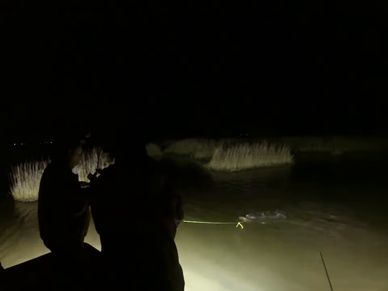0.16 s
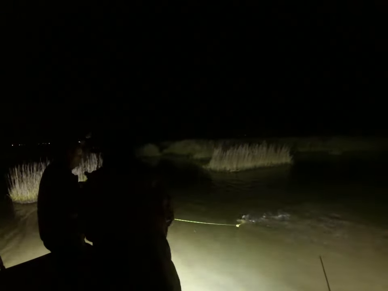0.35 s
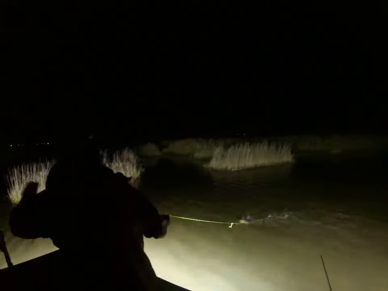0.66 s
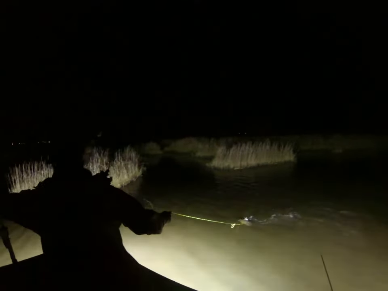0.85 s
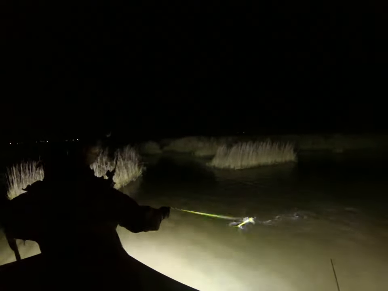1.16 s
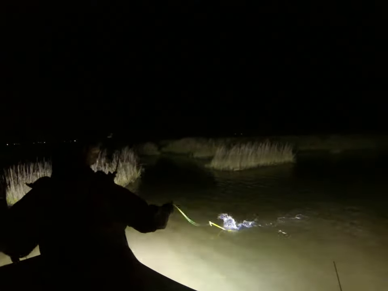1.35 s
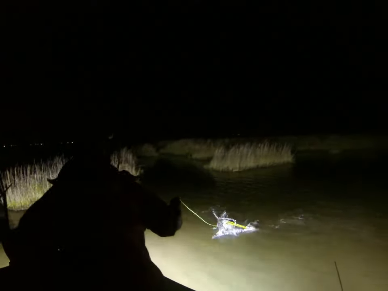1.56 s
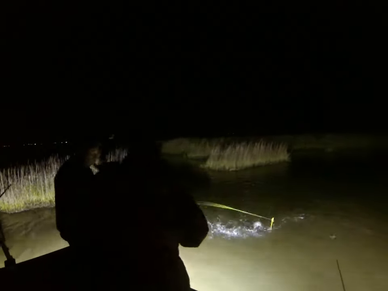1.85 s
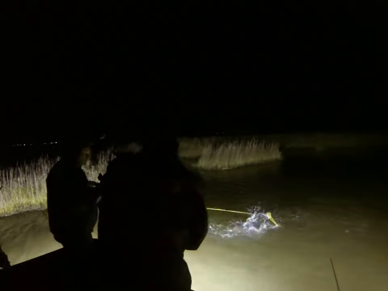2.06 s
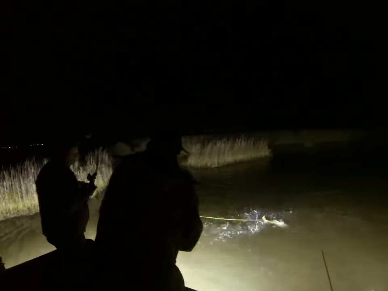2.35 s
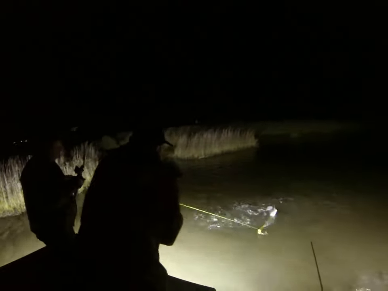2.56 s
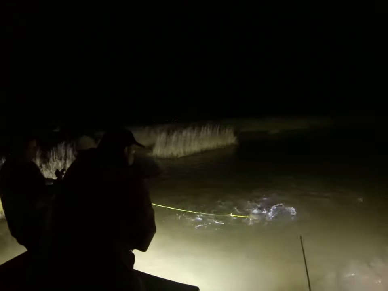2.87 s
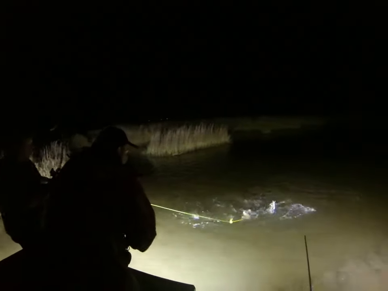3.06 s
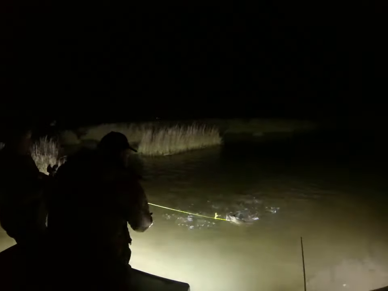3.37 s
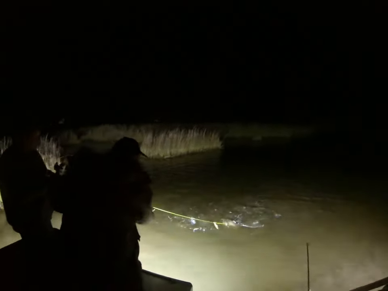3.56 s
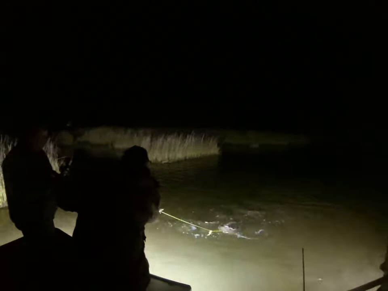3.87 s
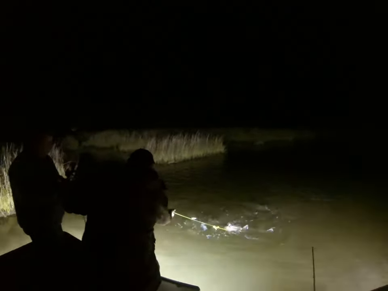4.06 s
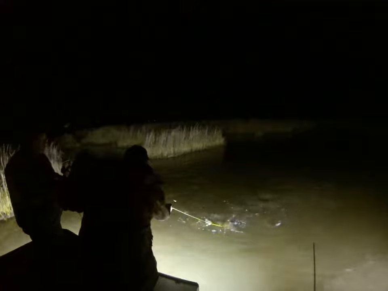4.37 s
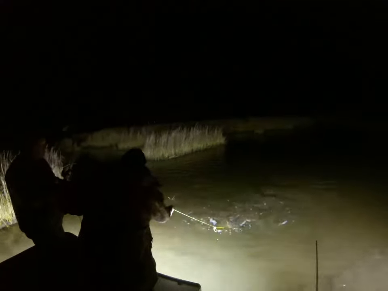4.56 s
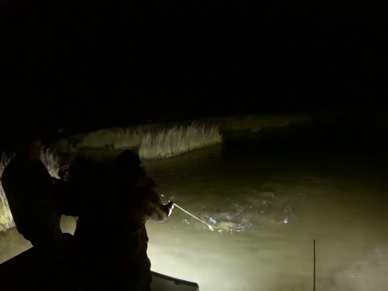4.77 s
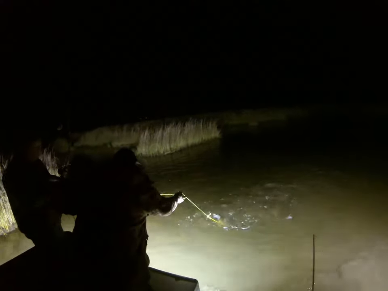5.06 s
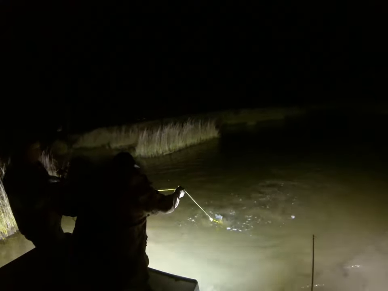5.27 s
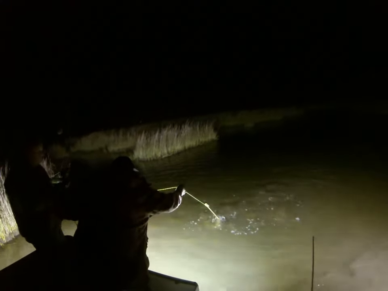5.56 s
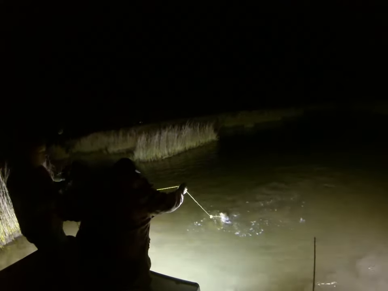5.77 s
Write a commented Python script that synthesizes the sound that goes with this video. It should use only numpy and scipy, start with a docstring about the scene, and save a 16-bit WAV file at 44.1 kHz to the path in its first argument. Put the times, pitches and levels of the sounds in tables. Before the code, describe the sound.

An airboat engine drones steadily with a deep rumble, rattling clatter and a whine, with a few dull knocks and faint splashes.

```python
"""A single-cylinder engine drones through the hull of a flat boat at night, heard from on board.
Its valves and piston rattle the muffler, cover and fins, and a wheel that it drives whines.
A slower engine idles under it, so that their hums beat. The hull rocks and takes a few dull bumps;
water splashes faintly, with a steady hiss farther from the microphone."""
import sys
import numpy as np
from scipy import signal
from scipy.fft import rfft, irfft, next_fast_len
from scipy.io import wavfile
from scipy.ndimage import uniform_filter1d, map_coordinates

SR = 44100
rng = np.random.default_rng(int(sys.argv[2]) if len(sys.argv) > 2 else 0)


def master(y):
    """Save y as 16-bit WAV."""
    cut = np.clip(np.atleast_2d(y).T, -1, 1)
    pcm = np.round(cut * 32767)  # scale
    wavfile.write(sys.argv[1], SR, pcm.astype(np.int16))


N = 261072

# Colours of far water, spray and droplets. Each row: frequency in Hz, relative density in dB.
HISS_SPECTRUM = [(2500, -52.5), (4500, -5.5), (6000, -7.5), (7500, -2), (10000, -10), (12000, -14.5),
                 (15000, -15.5), (17000, -57)]
SPRAY_SPECTRUM = [(1500, -40), (3000, 0), (4500, -4), (6200, 0), (8500, -10), (12000, -10), (15000, -18),
                  (17000, -60)]
DROPLET_SPECTRUM = [(3000, -40), (6000, -6), (8000, 0), (11000, 0), (14000, -8), (17000, -60)]
# Faint splashes. Each row: start in seconds, relative level in dB, seconds to fall 60 dB.
SPLASHES = [(1.165, -66, .02), (1.34, -72, .15), (1.889, -59, .06), (2.415, -67, .03), (2.8, -70, .15),
            (3.995, -68, .03)]
# The spatter of droplets. Each row: time in seconds, level in dB.
SPATTER_LEVEL = [(0, -89.5), (.5, -85.5), (.95, -84), (1.25, -86), (1.4, -83.5), (1.75, -82), (2.1, -87.5),
                 (2.5, -83.5), (3.2, -86), (5.92, -87.5)]

# The hull rocking. Each row: frequency in Hz, relative density in dB.
ROCKING_SPECTRUM = [(5, -29), (10, -4.5), (25, 0), (44, -4), (56, 3.5), (64, -14), (80, -77)]
# Bumps on the hull. Each row: start in seconds, level in dB, pitch in Hz, seconds to fall 60 dB.
HULL_BUMPS = [(2.91, -48, 270, .06), (2.925, -26, 25, .2), (3.335, -23, 14, .3), (3.853, -23, 19, .2),
              (3.975, -19, 24, .2), (4.08, -50, 260, .05), (4.15, -61, 810, .2), (4.13, -62, 670, .2),
              (4.57, -56, 420, .1)]

# The idling engine's pace, sagging once. Each row: time in seconds, firing rate in Hz.
IDLE_FIRING_RATE = [(0, 58.12), (1.6, 58.39), (2.9, 58.34), (3.3, 57.27), (3.8, 58.33), (5.92, 58.23)]
# Its hum. Each row: time in seconds, level in dB.
IDLE_HUM_LEVEL = [(0, -38.8), (1.6, -38.7), (1.9, -42.6), (2.42, -36.3), (2.75, -44.3), (3.3, -37.6),
                  (3.8, -49.4), (4.25, -37.4), (4.47, -44.0), (4.85, -35.4), (5.3, -41.9), (5.92, -39.7)]
# Its weaker tones. Each row: multiple of the firing rate, level in dB.
IDLE_ORDERS = [(.5, -49), (1.5, -62), (2, -58), (2.25, -61), (2.5, -61), (3, -67), (3.5, -68), (4.5, -74),
               (5, -75)]
# Its exhaust and propeller wash. Each row: frequency in Hz, relative density in dB.
RUMBLE_SPECTRUM = [(50, -19), (64, 2.5), (100, -2.5), (145, -2.5), (170, -7.5), (182, -10), (260, -17.5),
                   (480, -21.5), (700, -25), (850, -30), (1150, -28.5), (1600, -62.5), (2500, -120)]

# The resonance that the wheel's overtones cross. Each row: time in seconds, centre in Hz, level in dB.
WHINE_RESONANCE = [(0, 695, -74), (.6, 765, -71), (1.5, 765, -71.5), (1.8, 592, -66), (2.4, 624, -68),
                   (3.5, 660, -69), (3.9, 626, -74), (4.3, 674, -71.5), (5, 607, -66), (5.92, 602, -64.5)]
# Overtones that sing out once. Each row: multiple of the wheel's speed, level in dB.
SINGING_ORDERS = [(26, -61), (28, -55)]
# Valve and piston contacts in a cycle of two turns.
# Each row: position as a share of the cycle, then relative dB in the muffler, the cover and the fins.
CONTACTS = [(.02, 2, -3, -2), (.13, -12, -8, -3), (.27, -12, -4, -4), (.39, -12, -10, -4), (.5, 0, -9, -2),
            (.62, -12, -2, -2), (.75, -8, 0, -3), (.86, -8, -2, -3), (.95, -2, -7, 0)]
# Resonances of those three parts. Each row: centre in Hz, width in Hz, relative level in dB.
MUFFLER_MODES = [(373, 330, -3.5), (615, 200, -1.5), (787, 30, -4)]
COVER_MODES = [(990, 25, -26), (1285, 55, -11), (1340, 70, -3), (1404, 30, 1), (1455, 90, -4),
               (1510, 110, -6), (1580, 130, -11), (1670, 120, -14)]
FIN_MODES = [(1960, 45, -2), (2583, 50, -3), (3220, 80, -4), (3400, 50, -3), (3505, 35, -6),
             (4600, 90, -16), (1870, 100, -8), (2060, 250, -5), (2570, 250, -2), (2700, 120, -4),
             (2820, 200, -8), (3050, 200, -10), (3340, 250, -6), (3600, 200, -12), (3800, 300, -13),
             (4000, 200, -12), (4560, 300, -19), (4800, 220, -18), (5400, 550, -21), (6200, 450, -25),
             (6700, 400, -28)]
# The clatter at the microphone.
# Each row: time in seconds, cover level in dB, fin level in dB, extra dB for the cover's hardest blow.
CLATTER_LEVELS = [(0, -48.5, -55.5, -3), (.7, -50.5, -56, -1.5), (1.9, -50, -54.5, 0.5),
                  (2.5, -49.5, -54.5, 2), (3.3, -49.5, -54.5, -0.5), (3.85, -48.5, -55.5, -1.5),
                  (4.2, -50, -54.5, 3), (5.92, -48, -54, 1)]
# The single-cylinder engine hunting round its set speed. Each row: time in seconds, shaft speed in Hz.
SHAFT_SPEED = [(0, 48.03), (.3, 47.81), (.8, 48.51), (1.4, 48.95), (1.75, 48.03), (1.95, 47.19),
               (2.75, 47.81), (3.35, 47.97), (3.85, 47.44), (4.15, 48.7), (4.75, 48.11), (5.2, 47.46),
               (5.65, 47.1), (5.92, 48.2)]
# Its hum in the hull. Each row: time in seconds, level in dB.
DRONE_HUM_LEVEL = [(0, -20), (.2, -21.8), (.37, -19.2), (.5, -21.8), (.7, -18.8), (1.4, -20.3), (1.95, -22),
                   (2.8, -21.6), (2.94, -25.5), (3.03, -22.6), (3.33, -21.2), (3.8, -27), (3.95, -25.9),
                   (4.05, -19.9), (4.4, -16.8), (4.53, -19), (4.65, -17.6), (4.9, -18.8), (5.15, -21.4),
                   (5.3, -19.5), (5.52, -22.6), (5.72, -18.7), (5.92, -18.6)]
# Its weaker tones. Each row: multiple of the shaft speed, level in dB.
DRONE_ORDERS = [(.5, -52), (2, -49), (3, -58), (3.5, -62)]


def amp(db):
    """Decibels to gain."""
    return 10 ** (np.asarray(db) / 20)


def unit(x):
    """x at rms 1."""
    return x / np.sqrt(np.mean(x ** 2) + 1e-20)


def curves(rows):
    """One value per sample for each column after the time."""
    times, *columns = np.transpose(rows)
    return [np.interp(np.arange(N) / SR, times, column) for column in columns]


def wobble(rate):
    """A smooth random curve, rate knots a second."""
    knots = rng.standard_normal(int(N / SR * 60) + 4)
    return map_coordinates(knots, [np.arange(N) * rate / SR])


def filtered(x, response):
    """x through a filter given as a complex response of frequency."""
    size = 2 * next_fast_len(N // 2 + SR // 4)
    return irfft(rfft(x, size) * response(np.fft.rfftfreq(size, 1 / SR)), size)[:N]


def rush(spectrum, patchy_db):
    """Noise of rms 1 with the given colour and patches of random gain."""
    frames = signal.stft(rng.standard_normal(N), nperseg=512)[2]
    patches = uniform_filter1d(rng.standard_normal(frames.shape), size=5, axis=0)
    patches = uniform_filter1d(patches, size=10, axis=1)
    noise = signal.istft(frames * amp(patchy_db * unit(patches)), nperseg=512)[1][:N]
    knot_hz, db = np.transpose(spectrum)
    return unit(filtered(noise, lambda hz: amp(np.interp(np.log(hz + 1), np.log(knot_hz + 1), db))))


def orders(turns, table, flutter_db, drift):
    """Sines on multiples of a rotation, each wavering in level and phase."""
    out = 0
    for k, db in table:
        gain = np.sqrt(2) * amp(db + flutter_db * wobble(7))
        out += gain * np.sin(2 * np.pi * (k * turns + drift * np.sqrt(k) * wobble(5)))
    return out


def ringing(modes):
    """The causal response of steep resonances whose powers add."""
    def response(hz):
        power = sum(amp(2 * db) / (1 + (2 * (hz - centre) / width) ** 2) ** 2
                    for centre, width, db in modes)
        cepstrum = irfft(np.log(power + 1e-12) / 2)
        causal_fold = 1 + np.sign(np.fft.fftfreq(len(cepstrum)))
        return np.exp(rfft(cepstrum * causal_fold)[:len(hz)])
    return response


def water():
    """Water round the boat: short splashes of spray, a spatter of droplets and a steady far hiss."""
    splashes, t = np.zeros(N + SR), np.arange(SR // 2) / SR
    for start, db, t60 in SPLASHES:
        splashes[round(start * SR):][:len(t)] += 2 * amp(db - 60 * t / t60) * (1 - np.exp(-t / .004))
    impacts = (rng.random(N) < 170 / SR) * amp(3.5 * rng.standard_normal(N))  # about 170 a second
    droplets = unit(signal.fftconvolve(impacts, amp(-60 * t / .008))[:N])
    spatter = amp(curves(SPATTER_LEVEL)[0]) * droplets * rush(DROPLET_SPECTRUM, patchy_db=3.5)
    hiss = amp(-76 + .7 * wobble(9)) * rush(HISS_SPECTRUM, patchy_db=1.5)
    return splashes[:N] * rush(SPRAY_SPECTRUM, patchy_db=1) + spatter + hiss


def hull():
    """Under the microphone the hull rocks in the lowest bass and rings dully at each bump."""
    bumps, t = np.zeros(N + SR), np.arange(SR // 2) / SR
    for start, db, hz, t60 in HULL_BUMPS:
        envelope = amp(db - 60 * t / t60) * (1 - np.exp(-t * hz * 1.5))
        bumps[round(start * SR):][:len(t)] += envelope * np.sin(2 * np.pi * hz * t)
    rocking = amp(-42.5 + 2 * wobble(2.3)) * rush(ROCKING_SPECTRUM, patchy_db=-.6)
    return bumps[:N] + rocking


def idling_engine():
    """Behind the drone, a firing hum with uneven cylinders, over broad exhaust rumble."""
    (firing_hz,), (hum_db,) = curves(IDLE_FIRING_RATE), curves(IDLE_HUM_LEVEL)
    firings = .379 + np.cumsum(firing_hz) / SR
    hum = np.sqrt(2) * amp(hum_db) * np.cos(2 * np.pi * firings)
    rumble = amp(-49 + .2 * wobble(5.3)) * rush(RUMBLE_SPECTRUM, patchy_db=1.5)
    return hum + orders(firings, IDLE_ORDERS, flutter_db=2.5, drift=.054) + rumble


def wheel_whine(turns, half_width_hz=60):
    """Overtones of the driven wheel, strongest near a resonance that shifts as the microphone turns."""
    centre_hz, level_db = curves(WHINE_RESONANCE)
    wheel_hz = np.gradient(turns) * SR
    out = 0
    for k in range(10, 17):
        detuning = (k * wheel_hz - centre_hz) / half_width_hz
        gain = amp(1.4 * wobble(6)) / (1 + detuning ** 2)
        out += gain * np.sin(2 * np.pi * (k * turns + .05 * wobble(8)))
    return np.sqrt(2) * amp(level_db) * out


def wheel_singing(turns, centre_s=3.755, half_length_s=.27):
    """Two high overtones of the driven wheel swell and fade once."""
    swell = np.exp(-((np.arange(N) / SR - centre_s) / half_length_s) ** 4)
    return swell * orders(turns, SINGING_ORDERS, flutter_db=3, drift=.02)


def clatter(cycles, muffler_db=-63):
    """Valve and piston contacts repeat with scatter, reach the parts unevenly and shake rattle loose."""
    cover_db, fins_db, slap_db = curves(CLATTER_LEVELS)
    starts = np.arange(int(cycles[-1]) + 1)
    part_blows = np.zeros((3, N))
    for share, *reach_db in CONTACTS:
        lateness, force = rng.standard_normal((2, 160))[:, :len(starts)]
        at = np.searchsorted(cycles, starts + share + .007 * lateness)
        part_blows[:, at[at < N]] += amp(np.add.outer(reach_db, 1.6 * force[at < N]))
    part_blows[1] *= amp(slap_db * (abs(cycles % 1 - .75) < .05))  # the cover's hardest blow
    t, out = np.arange(SR // 20) / SR, 0
    parts = [(MUFFLER_MODES, muffler_db, .4, .3),
             (COVER_MODES, cover_db, 1.2, .85),
             (FIN_MODES, fins_db, 2.6, .45)]
    for blows, (modes, db, steady_rattle, clean_knock) in zip(part_blows, parts):
        bursts = signal.fftconvolve(blows, amp(-60 * t / .06))[:N]
        rattle = unit((unit(bursts) + steady_rattle) * rng.standard_normal(N))
        out += amp(db) * unit(filtered(clean_knock * unit(blows) + rattle, ringing(modes)))
    return out


def droning_engine(belt_ratio=1.056):
    """Up front, one four-stroke cylinder: a nearly pure hum at shaft speed, with whine and clatter."""
    (shaft_hz,), (hum_db,) = curves(SHAFT_SPEED), curves(DRONE_HUM_LEVEL)
    turns = .11 + np.cumsum(shaft_hz) / SR
    hum = np.sqrt(2) * amp(hum_db + .5 * wobble(8)) * np.cos(2 * np.pi * turns)
    tones = orders(turns, DRONE_ORDERS, flutter_db=-.5, drift=.013)
    wheel = wheel_whine(belt_ratio * turns) + wheel_singing(belt_ratio * turns)
    return hum + tones + wheel + clatter(turns / 2)


def scene():
    """Both engines, the hull and the water, in mono from on board."""
    return (droning_engine() + idling_engine() + hull() + water())[None]


def record(dry):
    """The microphone passes nothing above its band limit."""
    return filtered(dry[0], lambda hz: hz < 15700)[None]


dry = scene()
out = record(dry)
master(out)
```